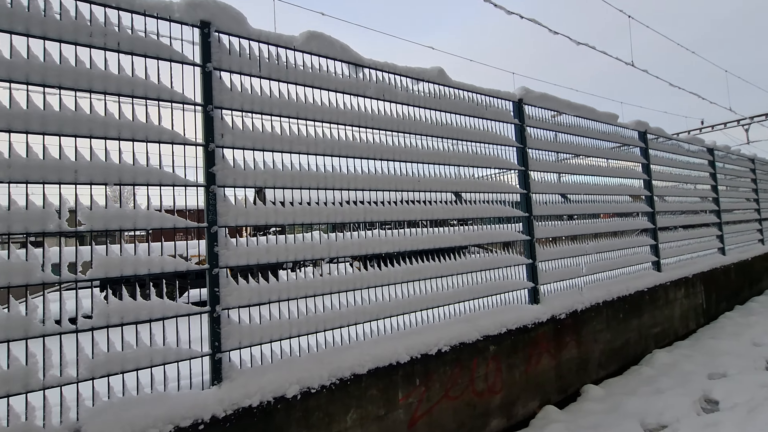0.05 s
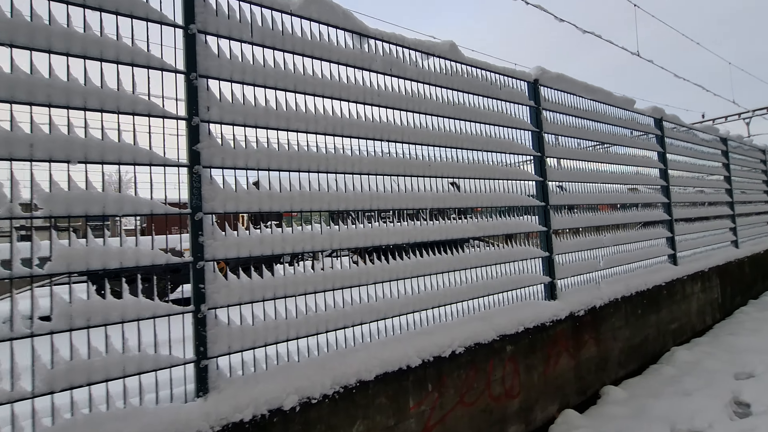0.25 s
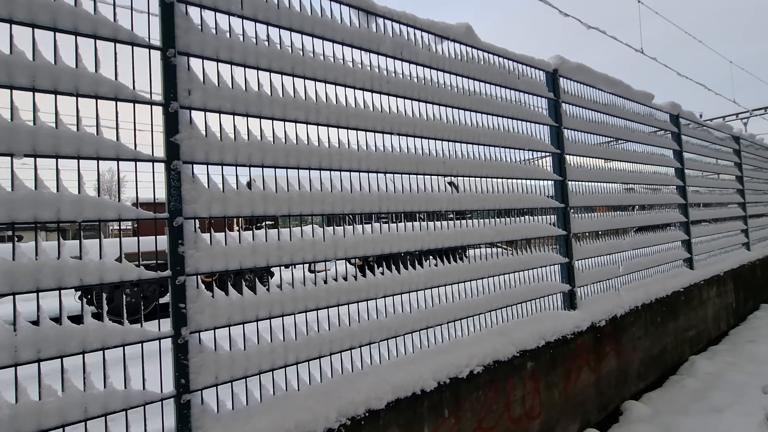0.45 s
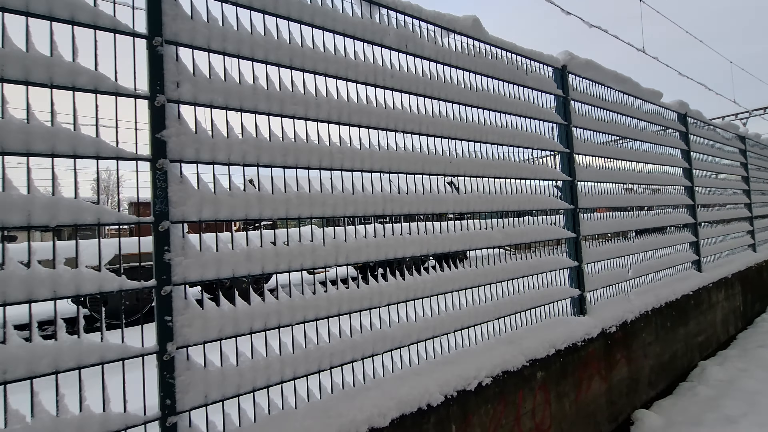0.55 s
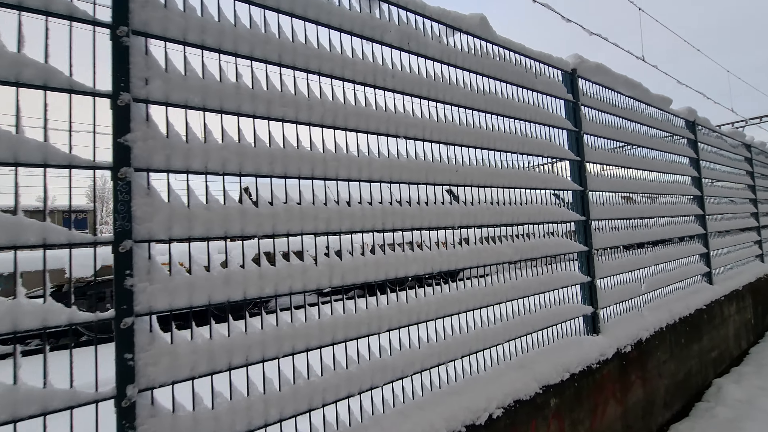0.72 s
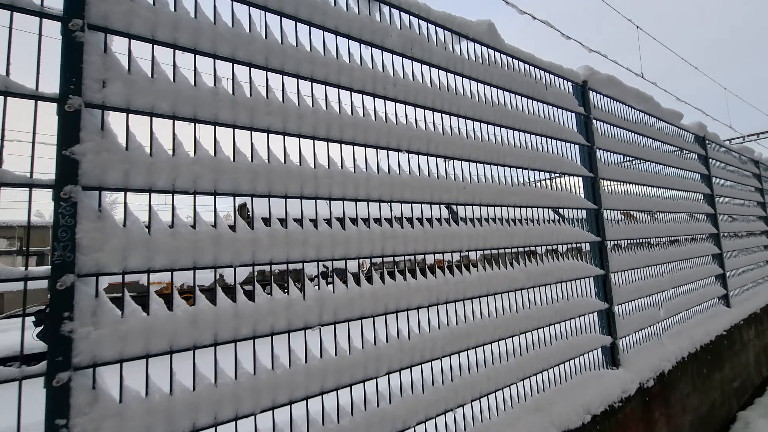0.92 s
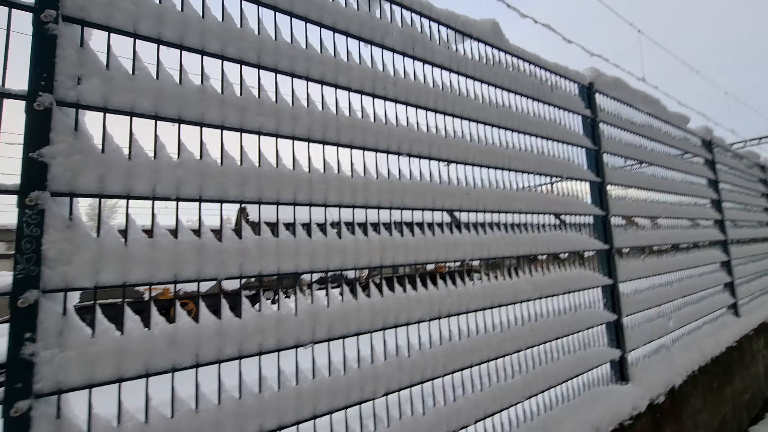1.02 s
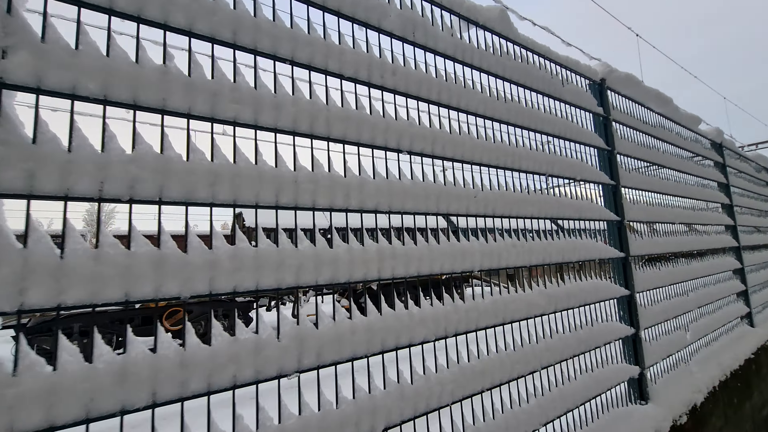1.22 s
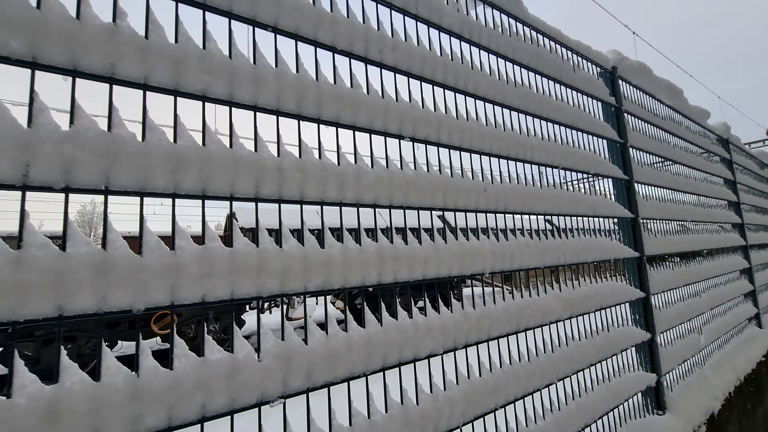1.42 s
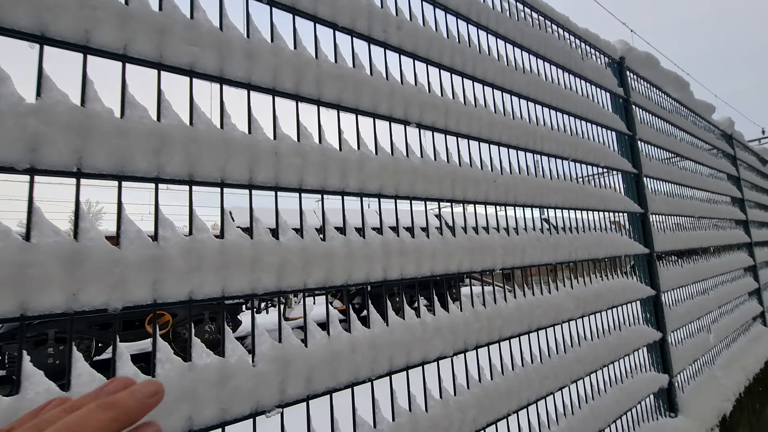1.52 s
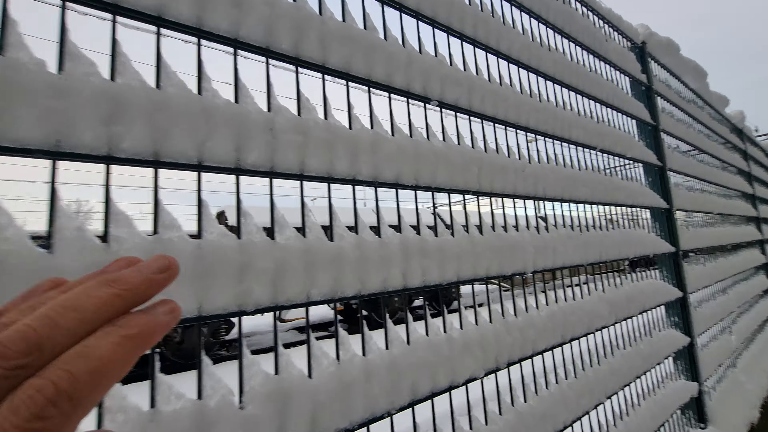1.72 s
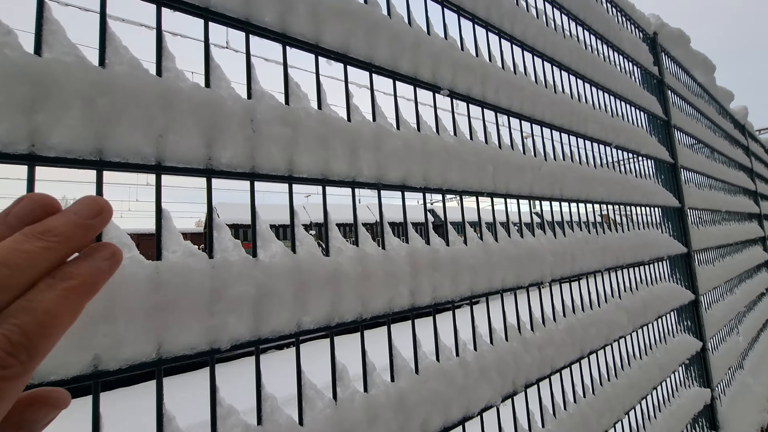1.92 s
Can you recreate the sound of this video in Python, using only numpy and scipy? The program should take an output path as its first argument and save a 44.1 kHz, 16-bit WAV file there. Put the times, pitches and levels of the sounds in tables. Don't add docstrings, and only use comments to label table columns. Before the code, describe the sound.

Close footsteps pack snow with short, low crunches and small ice ticks. Wind buffets the handheld stereo microphone in the first half second around one bright crack; jacket rustle and distant traffic lie beneath in open air.

```python
import sys
import numpy as np
from scipy import signal
from scipy.fft import rfft, irfft
from scipy.io import wavfile
from scipy.ndimage import uniform_filter1d

SR = 44100
rng = np.random.default_rng(int(sys.argv[2]) if len(sys.argv) > 2 else 0)


def to_wav(s):
    ch = np.atleast_2d(s).T
    pcm = np.round(np.clip(ch, -1, 1) * 32767)
    wavfile.write(sys.argv[1], SR, pcm.astype(np.int16))


def how_loud(loudness_db):
    steps = np.asarray(loudness_db, float) / 20
    return 10 ** steps


N = 85995
NEAR_LAG = 4


def level(x, db):
    return x * how_loud(db) / np.sqrt(np.mean(x ** 2))


def curve(table, column=1):
    rows = np.array(table, float)
    return np.interp(np.arange(N) / SR, rows[:, 0], rows[:, column])


def colour(x, points):
    rows = np.array(points, float)
    hz = np.fft.rfftfreq(N, 1 / SR) + 1
    point_hz = np.maximum(rows[:, 0], 1)
    gain_db = np.interp(np.log(hz), np.log(point_hz), rows[:, 1])
    return irfft(rfft(x) * how_loud(gain_db), N)


def band(x, hz, width_hz):
    b, a = signal.iirpeak(min(hz, .4 * SR), max(hz / width_hz, .55), fs=SR)
    return signal.lfilter(b, a, x)


def wide_band(x, hz, width_hz, second_width_hz):
    return band(band(x, hz, width_hz), hz, second_width_hz)


def walk(rate):
    hold = int(SR / rate)
    steps = np.repeat(rng.standard_normal(N // hold + 1), hold)
    return 1.29 * uniform_filter1d(uniform_filter1d(steps, hold), hold)[:N]


def pan(x, db):
    return x * how_loud(np.array([db / 2, -db / 2]).reshape(2, -1))


def add(out, start_s, shape, peak_db, pan_db):
    i = int(start_s * SR)
    n = min(len(shape), N - i - NEAR_LAG)
    left, right = pan(shape[:n] * how_loud(peak_db) / np.abs(shape).max(), pan_db)
    out[0, i + NEAR_LAG:i + NEAR_LAG + n] += left
    out[1, i:i + n] += right


def air(make):
    alike_hz, left_lag, lagged_share = 600, 21, 0.23
    bass, left_only, shared = make(), make(), make()
    low_pass = signal.butter(2, alike_hz, fs=SR, output="sos")

    def low(v):
        return signal.sosfilt(low_pass, v)

    def high(v):
        return v - low(v)

    late = lagged_share * np.roll(shared, left_lag)
    left_treble = late + np.sqrt(1 - lagged_share ** 2) * left_only
    return np.array([low(bass) + high(left_treble), low(bass) + high(shared)])


def wind():
    # centre in seconds, peak in dB, frequency in Hz.
    left_eddies = [
        (.227, -29.5, 65),
        (.247, -32.5, 95),
        (.272, -30.5, 90),
        (.326, -25.5, 59.4),
        (.335, -38, 131),
        (.354, -33, 100),
        (.542, -34.5, 54.5),
        (.612, -38, 60.4),
        (.688, -32.5, 68.4),
        (.776, -32, 52),
    ]
    # centre in seconds, peak in dB, frequency in Hz.
    right_eddies = [(0.255, -30.5, 132), (0.285, -25.5, 133), (0.308, -31, 55), (0.345, -24, 110),
                    (0.361, -26.5, 111), (0.371, -21.5, 113), (0.401, -23.5, 140), (0.416, -16.5, 154),
                    (0.425, -17.5, 108), (.447, -17.5, 187), (.469, -15.5, 94), (0.481, -22, 108),
                    (.497, -22, 132), (.507, -28.5, 120), (.487, -26, 172), (0.36, -26, 215),
                    (0.249, -32.5, 130), (0.26, -37, 230), (0.523, -33, 70), (0.556, -47, 190),
                    (.386, -33, 197)]
    # centre in seconds, peak in dB, frequency in Hz.
    thuds = [(0.106, -45.5, 55.3), (.49, -33.5, 50), (.895, -38, 65), (0.917, -37, 80.6),
             (1.077, -38.5, 58), (1.109, -39, 50), (1.199, -43.5, 109), (1.32, -39.5, 81), (1.489, -45, 56),
             (1.648, -36.5, 71.5), (1.866, -47, 55.6)]
    # time in seconds, left level in dB, right level in dB.
    gust = [
        (.18, -68, -60),
        (.23, -62, -41),
        (.34, -42, -39),
        (.42, -47, -35),
        (.5, -39, -45),
        (.56, -73, -63),
        (.8, -57, -55),
        (1.95, -59.5, -57),
    ]
    eddy_cycles, buffet_hz, buffet_width_hz = 0.55, 120, 120
    t = np.arange(N) / SR
    out = []
    for column, eddies in enumerate((left_eddies, right_eddies), 1):
        swing = np.zeros(N)
        for centre_s, peak_db, hz in eddies + thuds:
            age = t - centre_s
            bump = np.exp(-(age * hz / eddy_cycles) ** 2)
            swing += how_loud(peak_db) * bump * np.cos(2 * np.pi * hz * age - .6)
        rough = wide_band(rng.standard_normal(N), buffet_hz, buffet_width_hz, 2 * buffet_width_hz)
        buffet = level(rough * how_loud(2.1 * walk(30.1)), 0)
        out.append(swing + buffet * how_loud(curve(gust, column)))
    return np.array(out)


def snow_grains():
    # time in seconds, level in dB.
    tread = [(0, -48), (.2, -61), (.38, -42.5), (.45, -51), (.58, -49), (.72, -48), (.87, -48.5),
             (.955, -44), (.985, -45.5), (1.12, -54.5), (1.3, -51), (1.57, -46), (1.62, -41.5),
             (1.7, -47.5), (1.76, -47.5), (1.95, -55)]
    # frequency in Hz, level in dB per Hz.
    snow = [(120, 5.5), (220, 2.5), (420, 2.5), (900, -5), (1600, -14.5), (3000, -35), (6000, -29.5)]
    grains_per_s, scatter_db = 1200, 1

    def grains():
        hits = rng.random(N) < grains_per_s / SR
        force = how_loud(scatter_db * np.minimum(rng.exponential(size=N), 2))
        return hits * rng.standard_normal(N) * force

    return level(colour(air(grains), snow), -1) * how_loud(curve(tread))


def slumps():
    # start in seconds, peak in dB, ring in Hz, crunch against ring in dB.
    packs = [(0.643, -40.5, 294, 10), (0.699, -39, 492, 4), (0.741, -32.5, 441, -2.5), (0.82, -30, 213, -9),
             (0.869, -36, 223, -2), (0.917, -36.5, 221, -1.5), (0.964, -30, 244, -10),
             (0.973, -30, 245, -12), (1.036, -37, 392, -11), (1.073, -33, 195, -6), (1.187, -34.5, 192, -8),
             (1.329, -35, 226, 2), (1.495, -42, 408, -17), (1.58, -29, 403, -12.5), (1.612, -38, 397, 5),
             (1.641, -32.5, 167, -1), (1.629, -40.5, 324, 2.5), (1.69, -35, 342, -7),
             (1.863, -37.5, 220, -19)]
    # start in seconds, peak in dB, ring in Hz, crunch
    # against ring in dB.
    higher_rings = [
        (.821, -33, 458, -11),
        (.912, -54, 596, -4),
        (0.97, -35, 1060, 5),
        (1.074, -43, 726, 12),
        (1.578, -41.5, 1015, 7),
        (1.688, -54, 995, -1),
    ]
    ring_t60_s, crunch_db, crunch_s = 0.055, -4, 0.0084
    out, t = np.zeros((2, N)), np.arange(4000) / SR
    for start_s, peak_db, hz, extra_db in packs + higher_rings:
        ring = np.sin(2 * np.pi * hz * t) * (1 - np.exp(-t / 0.0023)) * how_loud(-60 * t / ring_t60_s)
        crunch = band(rng.standard_normal(len(t)), 1100, 510)
        crunch = crunch * t / crunch_s * np.exp(-t / crunch_s * 2)
        slump = ring / ring.max() + how_loud(crunch_db + extra_db) * crunch / crunch.max()
        add(out, start_s, slump, peak_db - 4.5, 0)
    return out


def snaps():
    # start in seconds, peak in dB, frequency in Hz, length in cycles.
    breaks = [(.0765, -43, 910, 1.3), (.0795, -43, 2400, 2), (.085, -47, 2620, 4.1), (.089, -48, 1510, 3.8),
              (.1415, -52, 1900, 1.9), (.147, -61, 2400, 3.5), (.36, -49, 7800, 6.5),
              (.3715, -43, 1790, 1.9), (.406, -40, 4350, 9.5), (.699, -38, 684, 2), (.734, -36, 365, 0.68),
              (.816, -47, 760, 3.2), (.9125, -36.5, 605, 2.8), (.924, -47, 1390, 2.5),
              (.961, -52, 865, 1.8), (0.9673, -39, 1010, 1.3), (.9755, -33, 690, 0.64),
              (.9815, -37, 960, 1.5), (1.04, -31, 356, 2.4), (1.069, -36, 600, 1.9),
              (1.167, -38.5, 325, 1.6), (1.248, -38.5, 460, 1.5), (1.2742, -49, 4180, 4.1),
              (1.5772, -33, 1100, 1.2), (1.581, -33, 930, 2), (1.611, -33, 510, 1.9),
              (1.636, -43, 1170, 3.3), (1.6875, -39.5, 950, 4), (1.693, -46, 2400, 1.7)]
    out, t = np.zeros((2, N)), np.arange(1500) / SR
    for start_s, peak_db, hz, cycles in breaks:
        age = t * hz / max(cycles, .5)
        snap = np.sin(2 * np.pi * hz * t) * age ** 0.37 * np.exp(-3.1 * age)
        add(out, start_s, snap, peak_db, -1.1)
    return out


def ticks():
    # start in seconds, peak in dB, frequency in Hz.
    ice_bits = [(0.031, -42, 5950), (0.081, -41.5, 1370), (0.082, -40, 2390), (0.1369, -40, 1400),
                (.207, -48, 1590), (0.589, -46.5, 1460), (.966, -42, 890), (1.0026, -38.5, 1440),
                (1.239, -43, 1100), (1.274, -36.5, 2400), (1.578, -38, 800), (1.79, -48, 9000)]
    t60_s, width = .012, .6
    out, t = np.zeros((2, N)), np.arange(2000) / SR
    for start_s, peak_db, hz in ice_bits:
        strike = (0.78 * rng.standard_normal(len(t)) + 8 * (t == 0)) * how_loud(-60 * t / t60_s)
        add(out, start_s, wide_band(strike, hz, width * hz, width * hz), peak_db, 0)
    return out


def strain():
    # time in seconds, level in dB.
    bending = [
        (.32, -69),
        (.345, -59),
        (.385, -54),
        (.394, -54),
        (.402, -56.5),
        (.415, -51),
        (.43, -81),
    ]
    hz, width_hz = 1630, 400
    noise = wide_band(rng.standard_normal((2, N)), hz, width_hz, 2 * width_hz)
    creak = level(noise + 0.65 * noise[::-1], 0)
    return creak * how_loud(curve(bending) + 1.4 * walk(220))


def crust():
    # start in seconds, peak in dB, centre in Hz, width in Hz.
    cracks = [
        (.3927, -27, 7400, 7000),
        (.3930, -40, 13400, 4100),
        (.3933, -31, 5300, 900),
        (.3948, -22.5, 7900, 3400),
        (.3956, -35, 5300, 900),
    ]
    crack_t60_s, crumble_s, left_lag = 0.0046, 0.019, 5.5
    out, t = np.zeros((2, N)), np.arange(2000) / SR
    for start_s, peak_db, hz, width_hz in cracks:
        noise = rng.standard_normal(len(t))
        burst = (noise + 1.8 * (t == 0)) * how_loud(-60 * t / crack_t60_s)
        add(out, start_s, wide_band(burst, hz, width_hz, 1.6 * width_hz), peak_db, -2.5)
    first_s = cracks[0][0]
    body = band(noise * how_loud(-60 * t / 0.024), 1700, 460)
    add(out, first_s, body, -37, -4.0)
    out[0] = np.roll(out[0], round(left_lag) - NEAR_LAG)
    since = np.arange(N) / SR - first_s
    hold = np.interp(since, [-.012, 0, crumble_s, crumble_s + 0.011], [0.046, 0.9, 0.54, 0.014])
    crumble = level(band(rng.standard_normal((2, N)), 6800, 3500), -49)
    return out + crumble * hold * how_loud(1.5 * walk(300))


def jacket():
    # time in seconds, hiss in dB, scrape in dB, left over right in dB (hiss only).
    rub = [(.06, -73, -68, -6), (.14, -64, -54, -5), (.18, -70.5, -64.5, 11), (.295, -64, -51, 2),
           (.33, -78, -55, -6), (.39, -69, -50, -17), (.44, -75, -56.5, 0), (.57, -75.5, -68.5, 13),
           (.65, -68, -58, 12), (.72, -61.5, -59, 7.5), (.79, -68.5, -57.5, 6), (1.06, -66, -57.5, 0),
           (1.11, -71, -64, -4), (1.22, -69, -58, 6), (1.28, -65, -56, 14), (1.54, -65.5, -55.5, 18),
           (1.66, -74.5, -56, 2), (1.8, -71, -64.5, 0)]
    # frequency in Hz, level in dB per Hz.
    hiss_colour = [(3000, -1), (5000, -6.5), (6200, -11.5), (8000, -1), (10000, -1.5), (13000, 1),
                   (16000, -5.5)]
    # frequency in Hz, level in dB per Hz.
    scrape_colour = [(600, -7.5), (1500, 0), (2500, -5), (3200, -8.5), (4500, -5), (6000, -13.5)]

    def noise():
        return rng.standard_normal(N)

    hiss_db = 0.89 * walk(24.2) + 2.0 * walk(150) + curve(rub)
    hiss = level(colour(air(noise), hiss_colour), 2.5) * how_loud(hiss_db)
    scrape_db = 0.25 * walk(34.4) + 0.86 * walk(150) + curve(rub, 2)
    scrape = level(colour(air(noise), scrape_colour), 0.2) * how_loud(scrape_db)
    return pan(hiss, curve(rub, 3)) + scrape


def traffic():
    # frequency in Hz, level in dB per Hz.
    distance = [(15, -53), (45, 6), (90, -0.5), (531, -8), (911, -20.5), (1190, -16), (6920, -36),
                (14400, -38), (16000, -50)]
    far = colour(air(lambda: rng.standard_normal(N)), distance)
    bed = np.zeros((2, N))
    for hz in 35 * 2. ** np.arange(9):
        bed += band(far, hz, 2.4 * hz) * how_loud(0.29 * walk(4.8))
    return level(bed, -49.5)


def electric_hum():
    # time in seconds, level in dB.
    drift = [(0, -52), (.07, -70), (.2, -58.5), (.33, -61), (.4, -73), (.76, -65), (.84, -60.5),
             (1.05, -68), (1.16, -56.5), (1.24, -64.5), (1.32, -60.5), (1.39, -84), (1.52, -63),
             (1.64, -74), (1.73, -78), (1.86, -69)]
    hz = 536.2 * (1 + 0.0021 * walk(8.6))
    tone = np.sin(2 * np.pi * np.cumsum(hz) / SR) * how_loud(0.7 * walk(7.4))
    return level(tone, 4) * how_loud(curve(drift))


def scene():
    underfoot = snow_grains() + slumps() + snaps() + ticks()
    return wind() + underfoot + strain() + crust() + jacket() + traffic() + electric_hum()


def top_cut(x):
    return signal.sosfilt(signal.butter(12, 15900, fs=SR, output="sos"), x)


def record(dry):
    # frequency in Hz, left over right in dB.
    port_colour = [(700, 1), (1300, -4), (2400, 2.5), (4400, -0.1), (7000, -1.6)]
    left = colour(dry[0], [(hz, db / 2) for hz, db in port_colour])
    right = colour(dry[1], [(hz, -db / 2) for hz, db in port_colour])
    shaded = right - 0.53 * band(right, 9800, 5800)
    bass_cut = signal.butter(3, 40, "high", fs=SR, output="sos")
    return top_cut(signal.sosfilt(bass_cut, np.array([left, shaded])))


dry = scene()
out = record(dry)
to_wav(out)
```